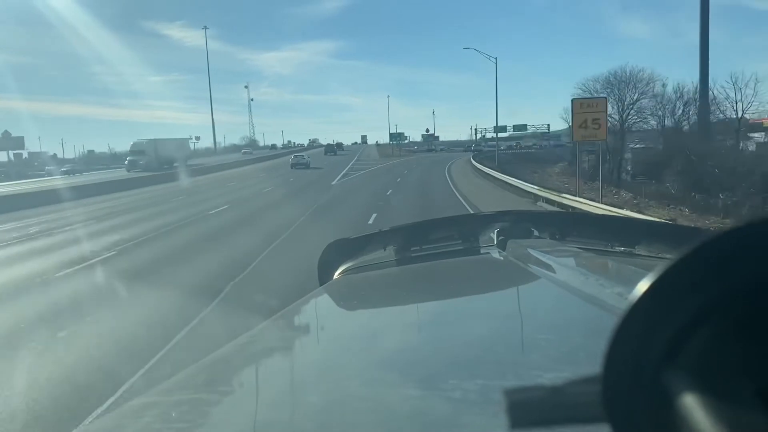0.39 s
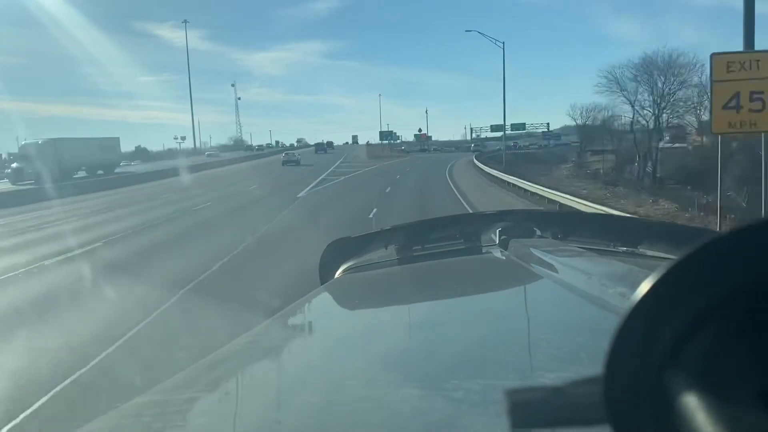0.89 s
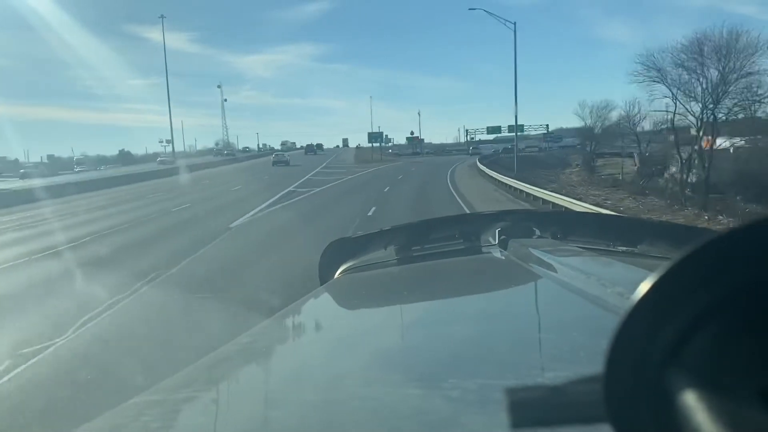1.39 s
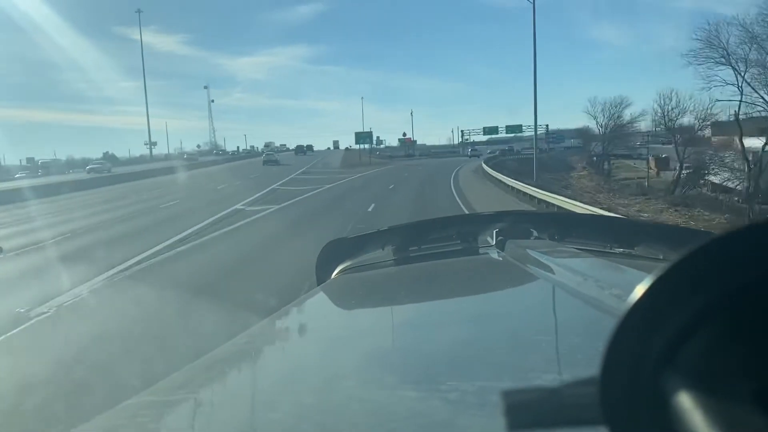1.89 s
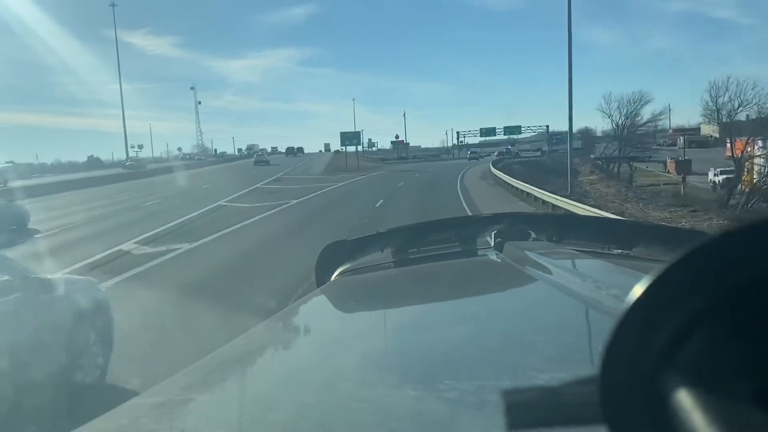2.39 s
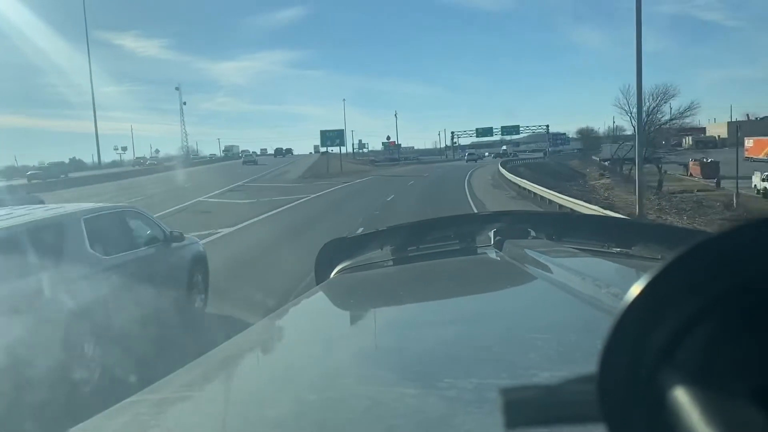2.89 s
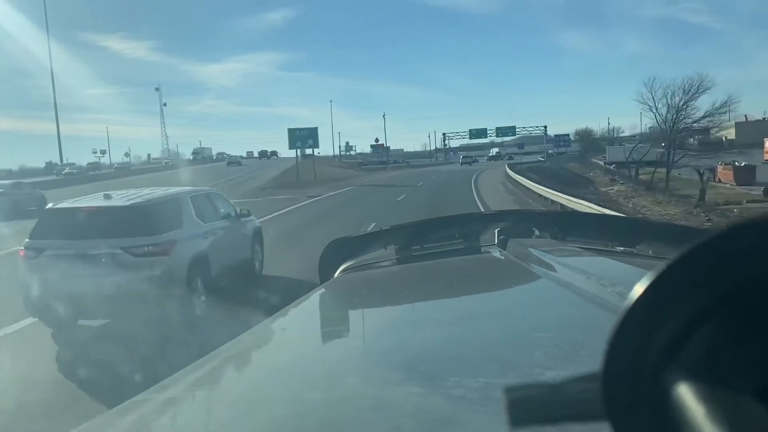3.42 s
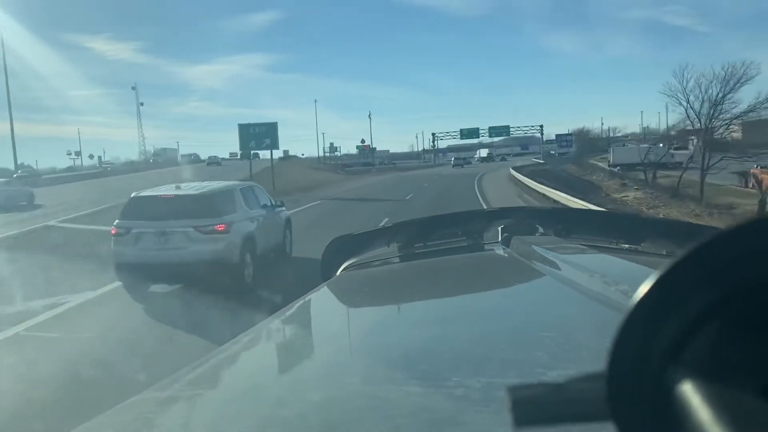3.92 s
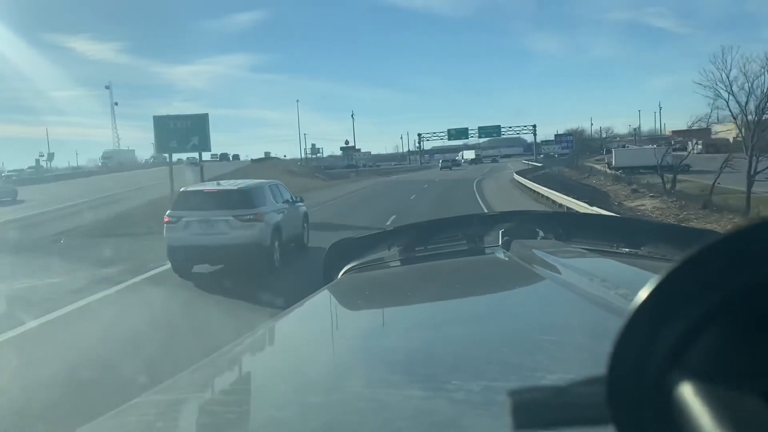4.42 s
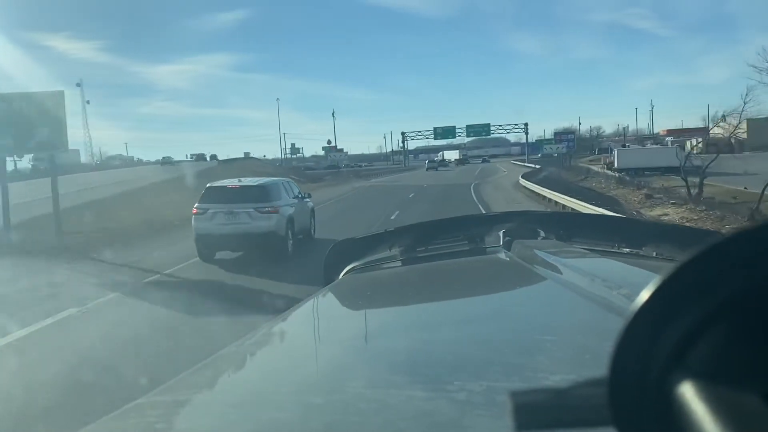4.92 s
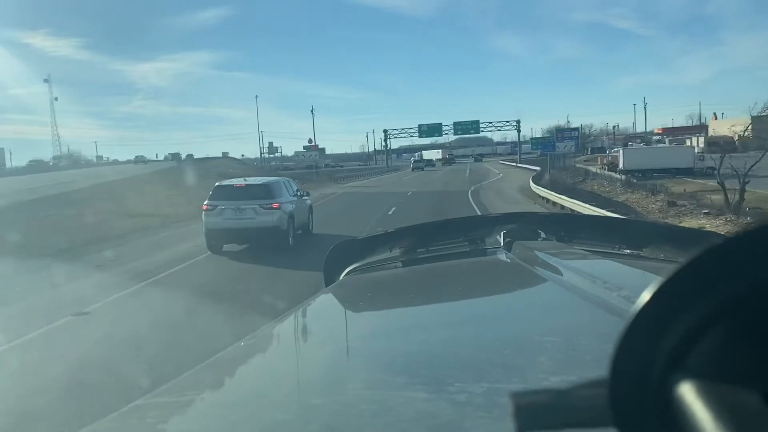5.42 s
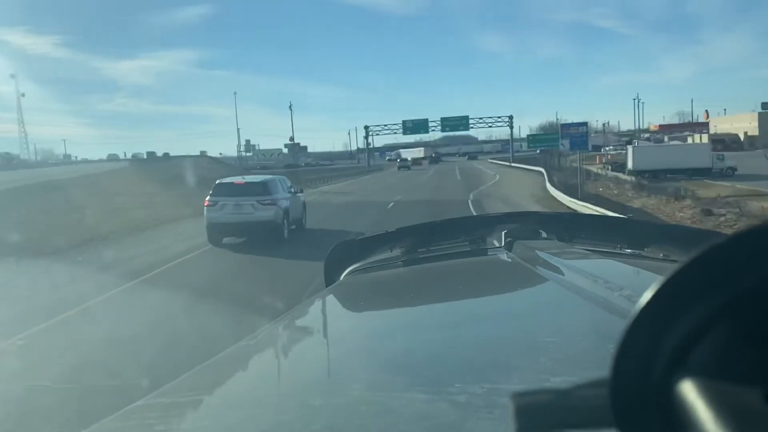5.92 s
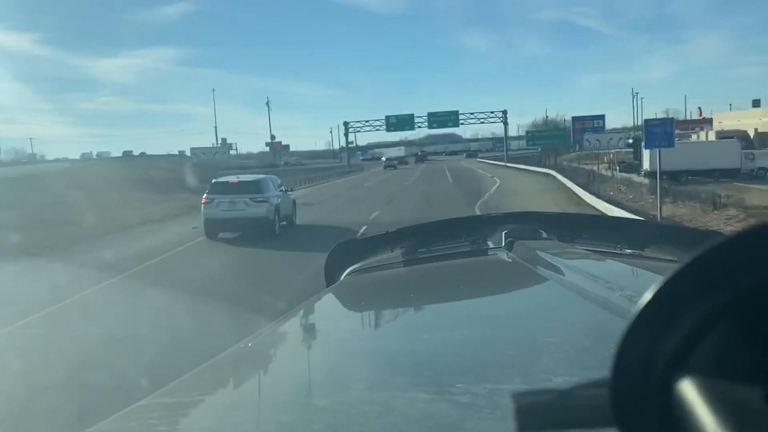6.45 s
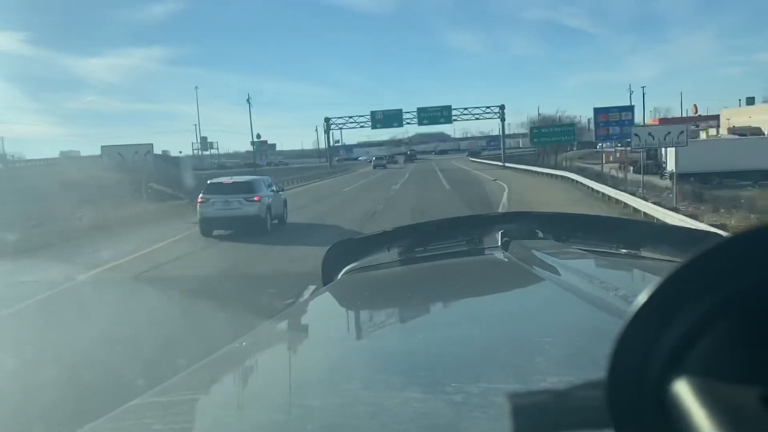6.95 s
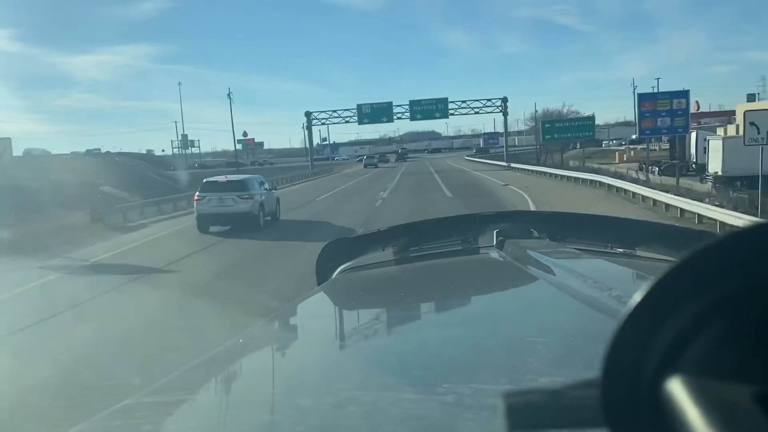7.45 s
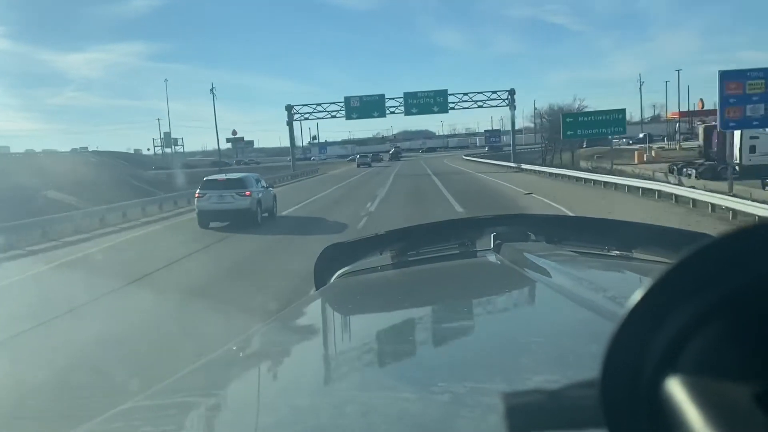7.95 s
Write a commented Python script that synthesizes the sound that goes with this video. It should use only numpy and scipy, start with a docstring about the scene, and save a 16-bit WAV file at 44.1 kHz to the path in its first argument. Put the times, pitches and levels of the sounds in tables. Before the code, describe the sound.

For about eight seconds we are inside a diesel truck cab as it slows on a highway exit. A deep, steady engine drone around 50 hertz dominates with road rumble, sinking gradually, then faster after 7 seconds. Muffled tyre roar, booming cab air and faint wind hiss surround it, easing slightly. A soft mid-low tread hum wavers until about 2.9 seconds. Very faint breathy turbo whistles flicker high above and glide downward. A tiny trim tick occurs at 3.5 seconds and a soft rustle at 3.8. Low road bumps swell around 5, 6.2 and 6.8 seconds, with heavier frame rumble from 7.5. Small bright ticks cluster at 7.5 to 7.6, duller ones at 7.9, alongside faint rustles and a thin, uneven brake squeak from 7.75 to 7.95. The in-cab stereo microphone hears centred bass and slightly wider treble.

```python
"""Diesel truck cab, slowing on a highway

The firing drone sinks, its overtones swelling as they cross panel resonances; two turbocharger whistles
glide down. All are fluttering sines. Shaped noise makes road rumble, tyre roar, wind hiss and rustles;
a wandering sine booms in the cab. A tread hums, trim ticks, brief blurred tones come and go, a brake squeaks.
Two microphone ports hear the bass alike and the treble a moment apart."""
import sys
import numpy as np
from scipy import signal
from scipy.fft import rfft, irfft, next_fast_len
from scipy.io import wavfile
from scipy.ndimage import uniform_filter1d, map_coordinates

SR = 44100
rng = np.random.default_rng(int(sys.argv[2]) if len(sys.argv) > 2 else 0)


def bounce(signal):
    """Save signal as a 16-bit WAV file at the path given by the first command-line argument."""
    frames = np.transpose(np.atleast_2d(signal))
    limited = np.clip(frames, -1, 1)
    pcm = np.round(limited * 32767).astype(np.int16)
    wavfile.write(sys.argv[1], SR, pcm)


def invert_db(level):
    """Linear amplitude ratio for a level in decibels (20 dB per decade), elementwise."""
    return 10 ** (np.asarray(level, dtype=float) / 20)


N = 356328


def unit(x):
    """Scaled to rms 1."""
    return x / np.sqrt(np.mean(x ** 2) + 1e-20)


def along(points, hz):
    """Each column after the frequency, read on a log axis."""
    f, *cols = np.transpose(points)
    return [np.interp(np.log(hz + 1), np.log(f + 1), c) for c in cols]


def curves(rows):
    """One value per sample for each column after the time."""
    s, *cols = np.transpose(rows)
    return [np.interp(np.arange(N) / SR, s, c) for c in cols]


def swells(rows):
    """For each column after time and spread, bell-shaped swells summed over the rows."""
    s, spread, *cols = np.transpose(rows)
    offset_s = np.arange(N) / SR - s[:, None]
    return np.array(cols) @ np.exp(-.5 * (offset_s / spread[:, None]) ** 2)


def wobble(rate):
    """A smooth random curve, rate knots a second."""
    knots = rng.standard_normal(int(N * rate / SR) + 4)
    return map_coordinates(knots, [np.arange(N) * rate / SR])


def filtered(x, response):
    """x times a complex response of frequency."""
    m = next_fast_len(N + 8192)
    spectrum = rfft(x, m) * response(np.fft.rfftfreq(m, 1 / SR))
    return irfft(spectrum, m)[..., :N]


def rush(gain, patchy_db):
    """Two unrelated noises of rms 1 that share patches of random gain."""
    z = signal.stft(rng.standard_normal((2, N)), nperseg=1024)[2]
    field = rng.standard_normal(z.shape[1:])
    field = uniform_filter1d(uniform_filter1d(field, size=10, axis=0), size=6, axis=1)
    patchy = signal.istft(z * invert_db(patchy_db * unit(field)), nperseg=1024)[1][:, :N]
    return unit(filtered(patchy, gain))


def tone(hz, db, flutter_db, rate, blur):
    """A gliding sine whose level flutters and whose phase wanders, along two paths."""
    turn = 2 * np.pi * np.cumsum(hz) / SR + blur * wobble(rate)
    paths = [np.sin(turn), np.cos(turn + .4 * wobble(1))]
    return np.sqrt(2) * invert_db(db + flutter_db * wobble(rate)) * np.array(paths)


def cab(hz):
    """Gain of the cab's air and panels: a bump or dip at each resonance."""
    # Each row: centre in Hz, width in Hz, peak gain in dB.
    resonances = [(105.8, 9.2, 3), (176.6, 28, 3), (272, 11, 1), (474, 28, 2), (554, 26, 4),
                  (649.6, 66, 6.5), (773, 52, 4), (909, 13, 3.5), (1106, 31, 5), (1300, 26, 4),
                  (1590, 260, 3.5), (1700, 66, 3), (1756, 90, -2), (2035, 22, 2), (2960, 95, -0.5),
                  (3835, 83, 6.5), (4810, 32, 8), (4970, 24, 6), (5150, 27, 5.5), (5530, 57, 7),
                  (6030, 57, 4.5), (6800, 27, 2)]
    return invert_db(sum(db / (1 + (2 * (hz - centre) / width) ** 2) for centre, width, db in resonances))


def road():
    """Boom, frame thuds and rumble, tyre roar and wind hiss drift in level as the truck slows; bumps kick the bass."""
    # Noise spectra ahead of the cab's resonances. Each row: frequency in Hz, relative level in dB per Hz.
    thud_points, rumble_points = [(18, -58), (26, -15), (34, -0.5), (45, -6), (60, 4.5), (78, -3.5),
                                  (100, 0.5), (130, -10.5), (170, -29), (250, -68)], [(71, -47), (120, -2.5), (237, -6.5), (330, -18.5),
                                                (430, -44), (730, -120)]
    roar_points, hiss_points = [(88, -46), (150, -8.5), (239, -15.5), (362, -11), (481, -11), (587, -13.5),
                                (649, -11), (832, -17), (1670, -26), (2950, -31.5), (4250, -46.5),
                                (6030, -50), (8000, -63), (10400, -99), (17600, -120)], [(2500, -23), (4000, -1.5), (7000, -4.5), (10000, -1.5),
                                              (13000, -8.5), (15500, -5.5), (16000, -34), (16300, -120)]
    # Boom, thud, rumble, roar, hiss: base level at the start in dB, and its drift in dB per s.
    start_db, drift_db_per_s = [-27, -19, -22, -28, -51], [0.24, -0.19, -0.61, -0.29, -0.32]
    # Bumps and smooth stretches. Each row: time in s, spread in s, boom gain in dB, frame gain in dB.
    bumps = [(0.11, .04, 6, 0), (0.8, 0.042, -3, 2), (1.75, 0.039, 3, 1.5), (2.4, 0.22, 0.5, -1),
             (3.3, 0.18, 5.5, 0), (4.22, 0.073, -4, 1.5), (4.84, 0.052, 8, -0.5), (5.06, 0.045, 11, 0),
             (5.55, .05, -1, 0.5), (6.21, 0.084, 8, 0), (6.8, 0.053, 12.5, 2), (7.14, 0.061, 4, 4.5),
             (7.6, 0.055, 7.5, 8.5), (7.79, 0.061, 2, 3.5), (8.0, 0.13, -4, 8.5)]
    # Brief swells and dips outside. Each row: time in s, spread in s, roar gain in dB, hiss gain in dB.
    gusts = [(1.55, 0.28, 1, 0.5), (3.4, 0.51, 0.5, 0), (5.2, .3, 0.5, -0.5), (6.05, 0.0802, 0, -1),
             (7.16, 0.13, 0, -3), (7.5, 0.07, 0.5, -2), (7.8, 0.11, -0.5, -8), (8.05, 0.06, -1.5, -5)]

    def in_cab(points, patchy_db):
        return rush(lambda hz: invert_db(along(points, hz)[0]) * cab(hz), patchy_db)

    levels_db = np.c_[start_db] + np.c_[drift_db_per_s] * np.arange(N) / SR
    boom_db, thud_db, rumble_db, roar_db, hiss_db = levels_db
    kick_db, frame_db = swells(bumps)
    swell_db, gust_db = swells(gusts)
    # the cab's air rings near one pitch
    boom_db = boom_db + kick_db + 1.4 * wobble(3.06)
    boom = tone(77 + 2.47 * wobble(4), boom_db, flutter_db=1.5, rate=10, blur=0.59)
    # shares of the frame gain: thud all, rumble 0.52, roar 0.27
    thud = invert_db(thud_db + frame_db + .6 * wobble(8)) * in_cab(thud_points, patchy_db=-0.5)
    rumble = invert_db(rumble_db + 0.52 * frame_db + 0.7 * wobble(5.8)) * in_cab(rumble_points, patchy_db=.5)
    roar_db = roar_db + swell_db + 0.27 * frame_db + 0.5 * wobble(9)
    roar = invert_db(roar_db) * in_cab(roar_points, patchy_db=1.0)
    hiss = invert_db(hiss_db + gust_db + 0.56 * wobble(12)) * in_cab(hiss_points, patchy_db=1.3)
    return boom + thud + rumble + roar + hiss


def tread():
    """A tyre tread hum that sinks with road speed."""
    # Each row: time in s, hum in Hz, level in dB.
    hum_rows = [(0.1, 495.6, -44), (0.4, 490, -40.5), (0.9, 487.7, -44), (1.15, 484, -42), (1.4, 479, -35),
                (1.65, 477, -41.5), (1.85, 474.3, -37.5), (2.3, 471, -41.5), (2.65, 467, -43),
                (2.9, 465, -70)]
    hz, db = curves(hum_rows)
    return tone(hz, db, flutter_db=2.8, rate=16, blur=.6)


def rustles():
    """Brief soft scrapes of shaped noise that swell and fade."""
    # Each row: time in s, spread in s, peak level in dB.
    rustle_rows = [(3.79, 0.018, -49.5), (7.59, 0.035, -53), (7.89, 0.012, -55)]
    # Each row: frequency in Hz, relative level in dB per Hz.
    scrape_points = [(1200, -49), (2500, -6), (5000, -3), (8500, -7), (11000, -16), (15000, -48),
                     (16000, -120)]
    t = np.arange(N) / SR
    swell = sum(invert_db(db) * np.exp(-.5 * ((t - s) / spread) ** 2) for s, spread, db in rustle_rows)
    scrape = rush(lambda hz: invert_db(along(scrape_points, hz)[0]), patchy_db=2.5)
    return swell * invert_db(3 * wobble(250)) * scrape


def walls(x):
    """Countless small reflections ripple the outside noise above the bass, differently at each port."""
    knots = rng.standard_normal((2, 400))  # one per 45 Hz

    def response(hz):
        ripple = np.array([map_coordinates(k, [np.clip(hz / 45, 0, 399)]) for k in knots])
        depth_db = 1.6 * np.clip(hz / 700 - .6, 0, 1) * (hz < 8000)
        return invert_db(depth_db * ripple)
    return filtered(x, response)


def ticks():
    """Each tick is a short crackle and a faint ring of plastic trim, duller or brighter from tick to tick."""
    # Each row: time in s, level in dB, treble against that in dB, left-right in dB.
    tick_rows = [(3.4744, -50, 0, 2.5), (7.498, -51, 8, 0), (7.5357, -55, 9, -1), (7.6071, -49, 13, 1),
                 (7.884, -42, -15, 3), (7.9194, -48, -3, 12)]
    # Each row: ring in Hz, relative level in dB, t60 in s.
    trim_rings = [(4400, 6, 0.014), (7400, -4, .008), (9640, 3.5, .01), (13500, -6, .006)]
    dull, bright = np.zeros((2, N + 2000)), np.zeros((2, N + 2000))
    t = np.arange(2000) / SR
    for s, db, bright_db, pan_db in tick_rows:
        ring = sum(invert_db(level + rng.normal(0, 2.5) - 60 * t / t60) * np.sin(2 * np.pi * hz * t)
                   for hz, level, t60 in trim_rings)
        decay = invert_db(-60 * t / .012) + .25 * invert_db(-60 * t / .06)
        crack = decay * rng.standard_normal((2, len(t)))
        tick = invert_db(db) * invert_db([[pan_db / 2], [-pan_db / 2]]) * (0.84 * ring + crack)
        start = round(s * SR)
        dull[:, start:][:, :len(t)] += tick
        bright[:, start:][:, :len(t)] += invert_db(bright_db) * tick
    below_7khz = lambda hz: 1 / (1 + (hz / 7000) ** 6)
    low = filtered(dull[:, :N], lambda hz: hz ** 2 / (hz ** 2 + 1200 ** 2) * below_7khz(hz))
    high = filtered(bright[:, :N], lambda hz: (1 - below_7khz(hz)) * (hz < 15800))
    return low + high


def hums_and_flecks():
    """Brief blurred tones that swell and fade: low hums near 450 Hz, rough flecks of noise at 1.3-1.7 kHz."""
    # Each row: time in s, spread in s, pitch in Hz, level in dB.
    blurred_rows = [(4.25, .05, 1520, -49), (4.5, .06, 457, -41), (5.55, .07, 452, -40),
                    (6.36, .06, 1720, -50), (6.45, .04, 1310, -47), (7.5, .16, 435, -42),
                    (7.63, .04, 1610, -47)]
    t = np.arange(N) / SR
    return sum(np.exp(-.5 * ((t - s) / spread) ** 2)
               * tone(np.full(N, hz), db, flutter_db=3, rate=hz / 25, blur=hz / 1100)
               for s, spread, hz, db in blurred_rows)


def squeak():
    """A thin uneven squeak as the brakes bite."""
    # Each row: time in s, pitch in Hz, level in dB.
    squeak_rows = [(7.755, 5370, -72), (7.77, 5350, -58), (7.792, 5340, -53), (7.82, 5290, -55),
                   (7.85, 5290, -57), (7.865, 5270, -63), (7.885, 5250, -53), (7.9, 5320, -59),
                   (7.92, 5330, -59), (7.945, 5310, -61), (7.97, 5300, -80)]
    hz, db = curves(squeak_rows)
    return tone(hz, db, flutter_db=2, rate=70, blur=.7)


def turbo():
    """Two blade whistles on one shaft, each a broken line in a breathy halo, fading in and out."""
    # Each row: time in s, lower whistle in Hz.
    spool_rows = [(0.0, 7897), (1.2, 7381), (2.0, 7120), (2.4, 6973), (2.8, 6871), (4.8, 6458), (6.0, 6160),
                  (7.2, 5898), (7.55, 5785), (7.68, 5650), (7.75, 5540), (8.08, 5100)]
    # Each row: time in s, lower whistle level in dB, upper whistle level in dB.
    whistle_rows = [(0.0, -66, -80), (0.4, -62, -80), (0.75, -67, -78), (1.3, -67, -74), (1.9, -68, -70),
                    (2.15, -72, -68), (2.5, -67, -66), (2.7, -67, -69), (2.9, -63, -64), (3.1, -66, -59),
                    (3.3, -66, -66), (3.5, -70, -64), (3.7, -65, -62), (3.9, -65, -57), (4.1, -65, -60),
                    (4.3, -59, -64), (4.6, -68, -65), (5.1, -67, -62), (5.6, -68, -60), (5.78, -68, -64),
                    (5.9, -60, -66), (6.0, -67, -65), (6.15, -65, -63), (6.3, -65, -67), (6.5, -59, -62),
                    (6.7, -66, -66), (7.1, -69, -67), (7.35, -64, -69), (7.55, -65, -72), (7.72, -69, -72),
                    (7.8, -80, -85)]
    # Halo against its whistle in dB: lower, upper.
    halos_db = [-4, -3]
    (lower_hz,), levels_db = curves(spool_rows), curves(whistle_rows)
    flicker = dict(flutter_db=3.5, rate=55, blur=.9)
    breath = dict(flutter_db=4, rate=260, blur=1.7)
    whistles = 0
    for ratio, db, halo_db in zip([1, 1.5715], levels_db, halos_db):
        db = db + .8 * wobble(14)
        line = tone(ratio * lower_hz, db, **flicker)
        halo = tone(ratio * lower_hz, db + halo_db, **breath)
        whistles = whistles + line + halo
    return whistles


def engine():
    """Each multiple of the firing rate swells while it crosses a panel resonance; higher multiples waver more."""
    # Each row: time in s, firing rate in Hz, load in dB.
    firing_rows = [(0.0, 53.67, 2), (0.5, 52.38, 1), (1.25, 51.07, -1), (1.75, 50.44, -1.5),
                   (2.25, 49.87, 1.5), (2.5, 49.52, 1), (2.8, 49.46, 1), (3.5, 49.2, 0), (4.25, 47.88, 0),
                   (5.0, 46.53, -0.5), (5.75, 45.72, -1), (6.5, 45.18, 0.5), (6.75, 44.83, -1),
                   (7.0, 44.3, -2), (7.25, 43.62, -2), (7.5, 42.94, 0.5), (7.75, 41.15, -3),
                   (8.08, 39.56, 5)]
    # Multiples of the firing rate, and the level of each in dB ahead of load and resonances.
    multiples, multiples_db = [1, 2, 10 / 3, 11 / 3, 4, 5, 5.5, 19 / 3, 7, 10, 11], [-22.5, -45.5, -52, -51, -48, -46, -48, -54, -54, -56, -52]
    # Panels each multiple shakes, one list for each. Each row: centre in Hz, width in Hz, peak gain in dB.
    panel_lists = [
        [(49.74, 4.6, 8)],
        [(91.8, 2.2, 21), (104.8, 3.6, 19.5)],
        [(174.7, 10, 16)],
        [(170, 17, 17.5)],
        [(179, 3, 14), (191.3, 2.2, 24.5)],
        [(219, 11, 19), (229.5, 8, 14.5), (239.8, 3, 7), (263.5, 9.5, 19)],
        [(239, 9, 14), (270, 10, 7), (278.5, 4, 18.5), (286, 8, 10)],
        [(314, 16, 10)],
        [(324, 12, 12)],
        [(475, 9, 15)],
        [(477, 10, 12), (500, 2, 13), (505.5, 2, 12), (527, 8, 8), (539.5, 9, 16.5), (545.5, 2.5, 9),
         (558, 5, 9), (572, 8, 6)],
    ]

    def shake(hz, panels):
        return 1 + sum((invert_db(db) - 1) / (1 + (2 * (hz - centre) / width) ** 4)
                       for centre, width, db in panels)

    firing_hz, load_db = curves(firing_rows)
    drone = 0
    for k, db, panels in zip(multiples, multiples_db, panel_lists):
        waver = dict(flutter_db=.6 + .12 * k, rate=7 + .6 * k, blur=.08 + .016 * k)
        drone = drone + tone(k * firing_hz, db + load_db, **waver) * shake(k * firing_hz, panels)
    return drone


def ports(paths):
    """Two sound paths become left and right with the ports' likeness, lag and balance."""
    # Each row: frequency in Hz, likeness 0-1, lag of the left port in rad, left-right in dB.
    bass_points, upper_points = [(55, .9995, 0, 0), (65, .99, 0, 0), (95, .95, 0, .3)], [(151, 1, -0.5, 0.5), (256, 0.56, 0.02, 0),
                                                     (426, 0.3, 0.5, 1.5), (640, 0.97, 2, -0.5),
                                                     (950, 0.18, 2.5, 1), (1260, 0.67, 1, -2.5),
                                                     (1570, 0.59, 2, 2), (2200, 0.26, -0.4, 4),
                                                     (3820, 0.65, -0.7, 2.5), (5200, 0.42, 0, 3),
                                                     (6750, 0.57, -0.5, 5.5), (8080, 0.35, 1, 0),
                                                     (8470, 0.94, 0.5, 0.5), (16000, .98, -0.5, -0.5)]

    def response(hz):
        alike, lag, balance_db = along(bass_points + upper_points, hz)
        turn = np.arccos(np.clip(alike, 0, 1)) / 2
        # above 6860 Hz the left port also trails by 0.2915 ms
        lag = lag + 2 * np.pi * .0002915 * np.maximum(hz - 6860, 0)
        left = invert_db(balance_db / 2) * np.exp(-.5j * lag)
        return np.array([[np.cos(turn) * left, np.sin(turn) * left],
                         [np.cos(turn) / left, -np.sin(turn) / left]])
    return filtered(paths, response).sum(axis=1)


def scene():
    """Everything in the cab, as the two ports receive it."""
    outside = walls(ports(tread() + road() + rustles()))
    inside = ports(engine() + turbo() + squeak() + hums_and_flecks())
    return outside + inside + ticks()


def top_cut(x):
    """Nothing passes above the cut-off."""
    return signal.sosfilt(signal.butter(12, 16010, fs=SR, output="sos"), x)


def record(dry):
    """The microphone's soft overload rounds off the loudest peaks."""
    top, hardness = .9, 5
    rounded = dry / (1 + np.abs(dry / top) ** hardness) ** (1 / hardness)
    return top_cut(rounded)


dry = scene()
out = record(dry)
bounce(out)
```